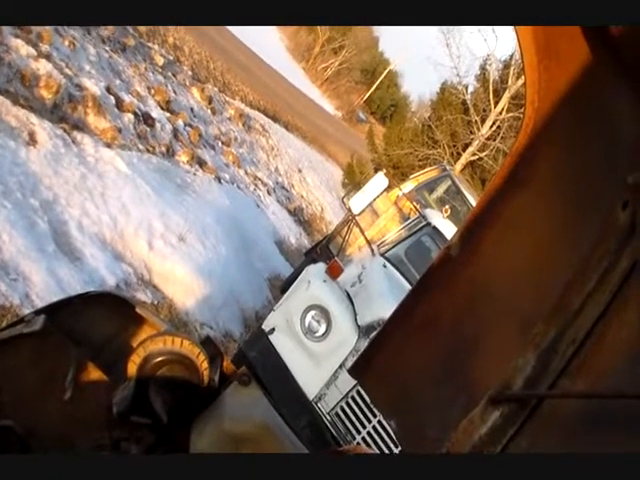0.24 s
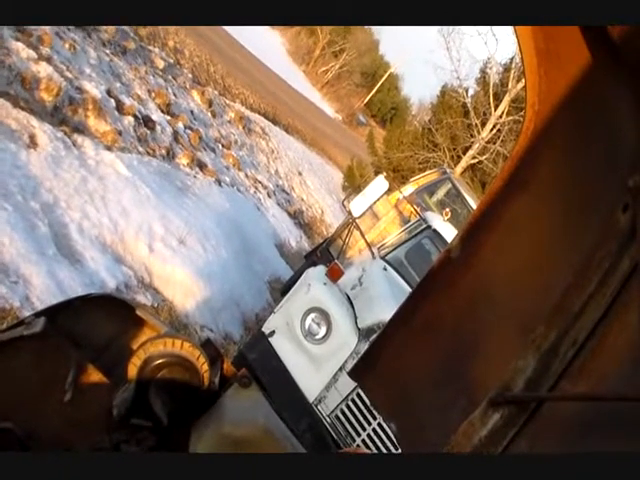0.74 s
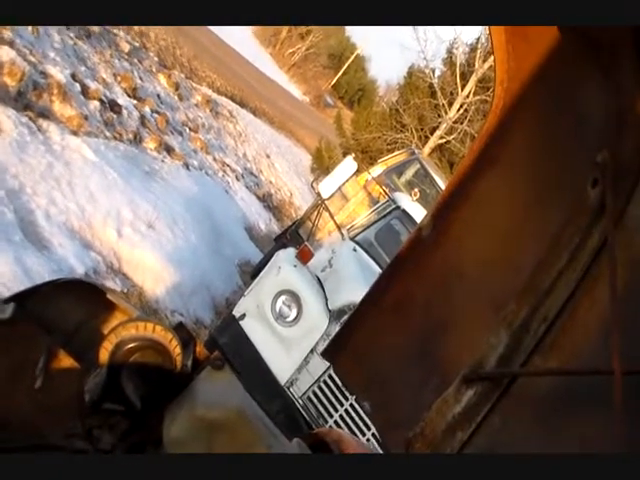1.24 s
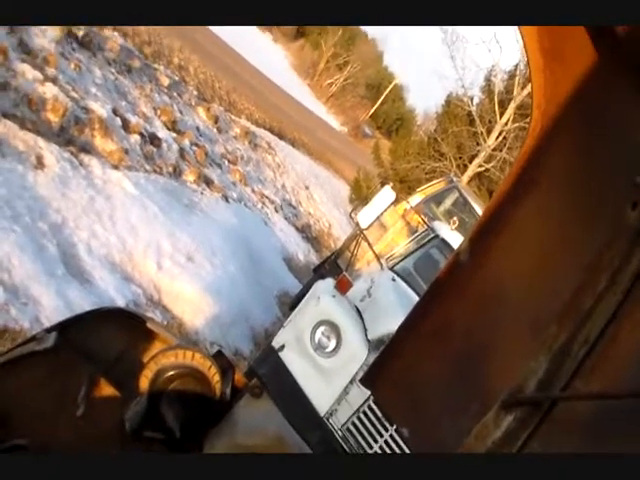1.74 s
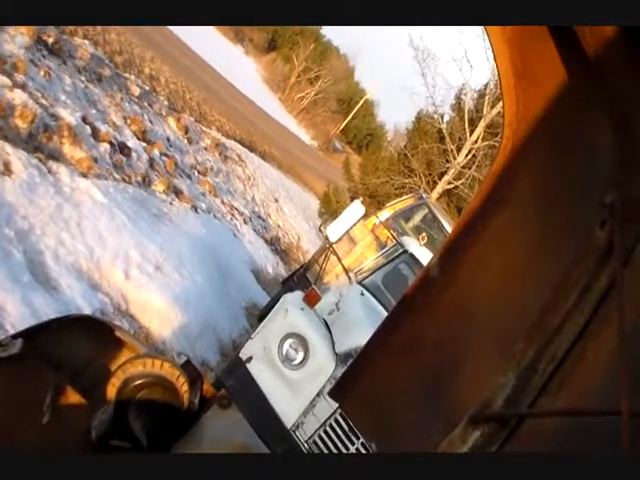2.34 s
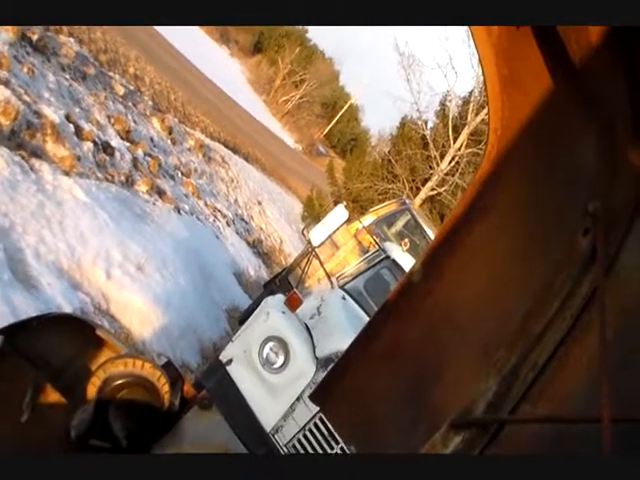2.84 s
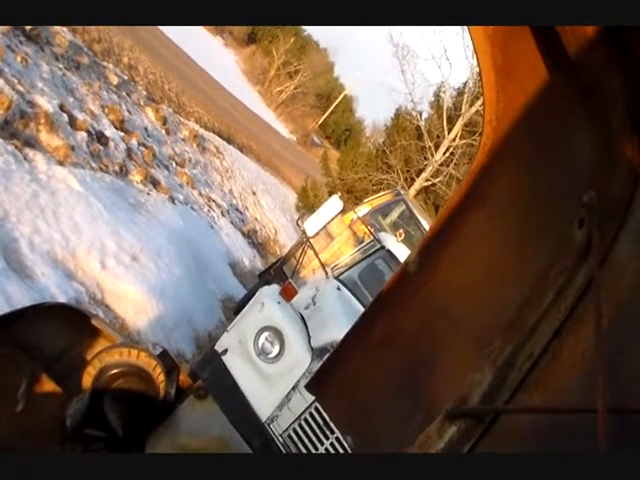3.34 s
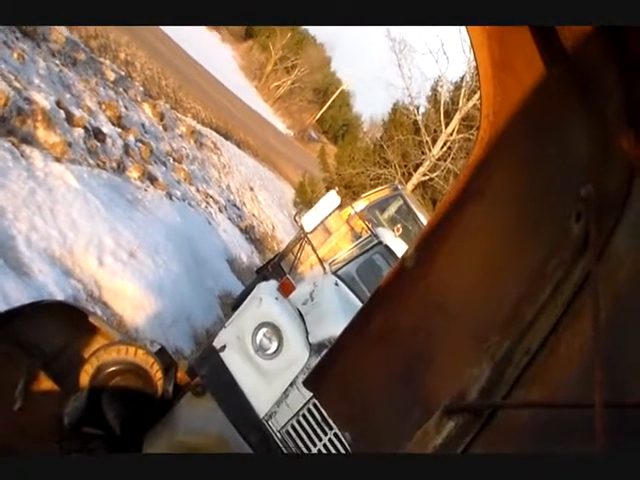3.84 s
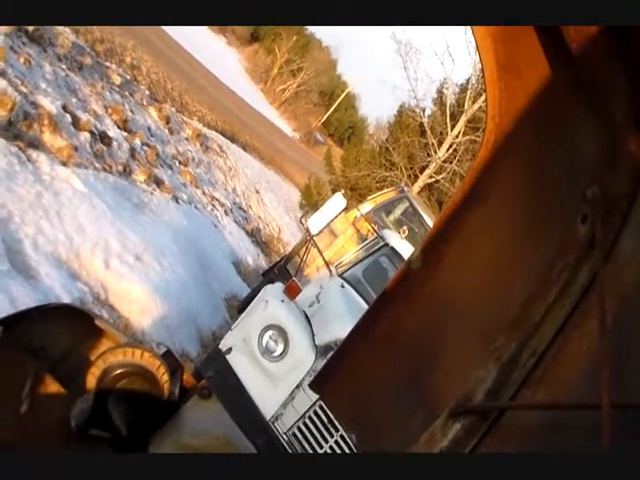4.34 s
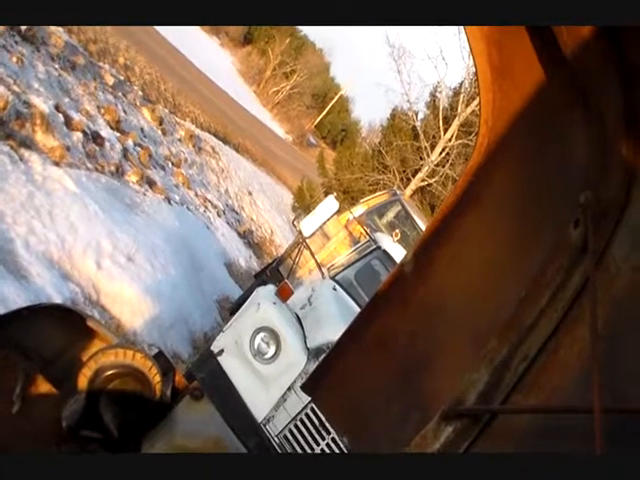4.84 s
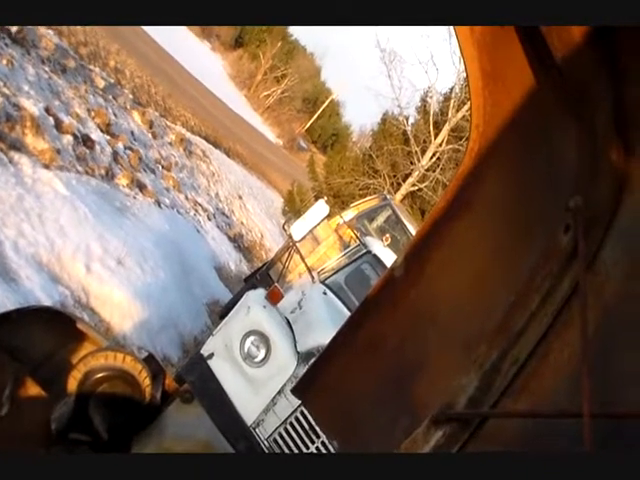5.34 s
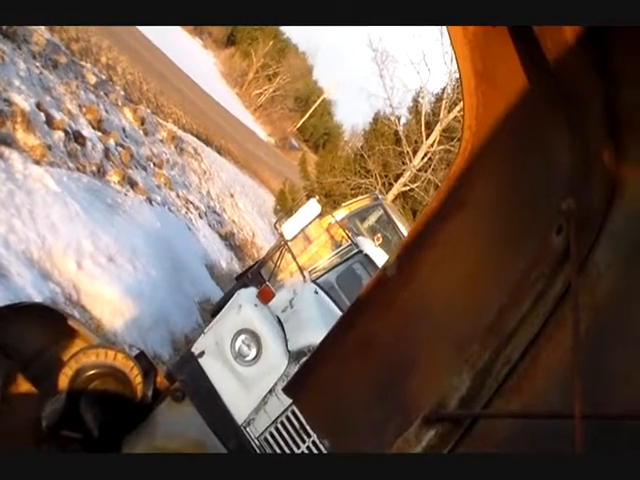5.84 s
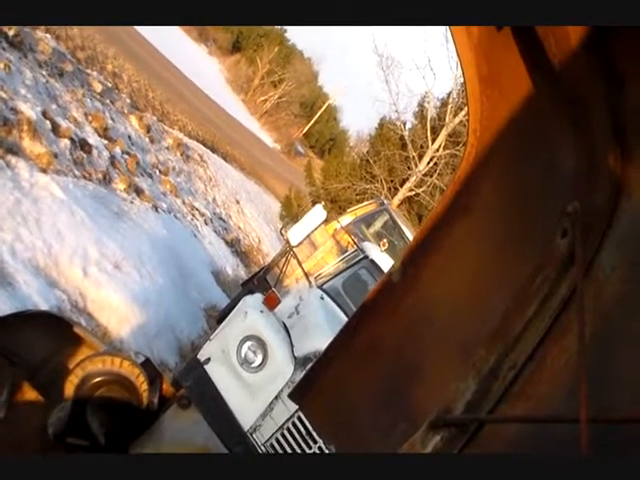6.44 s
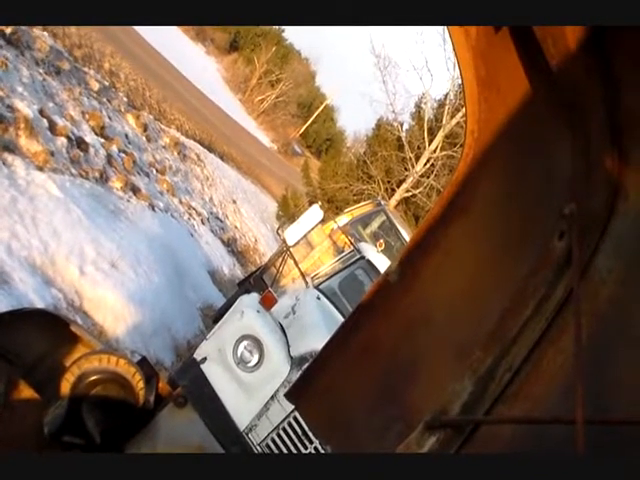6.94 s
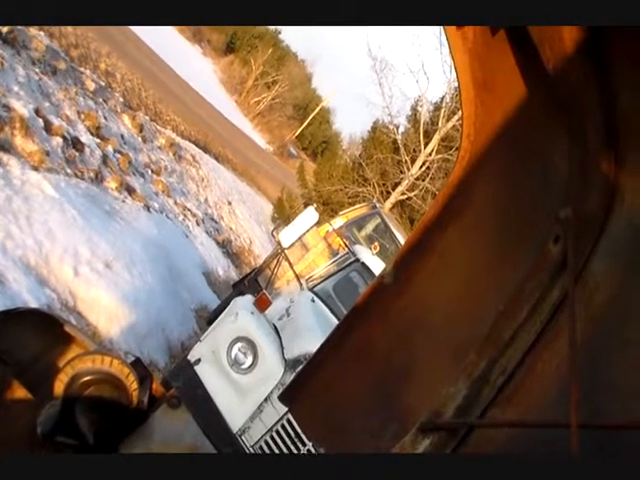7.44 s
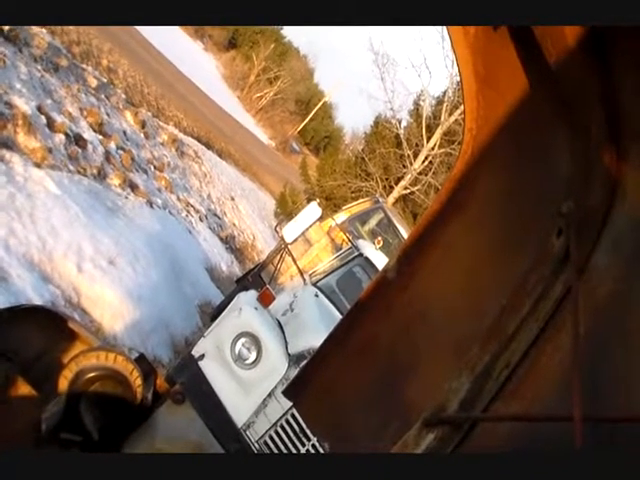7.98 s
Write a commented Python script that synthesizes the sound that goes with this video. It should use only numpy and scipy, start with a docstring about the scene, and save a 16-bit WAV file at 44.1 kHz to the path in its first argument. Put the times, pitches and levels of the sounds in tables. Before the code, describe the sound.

Four starter attempts on a cold engine, separated by pauses of about a second or less. Each opens with a faint metallic slide and a cluster of hard clacks, then a rising whir with scraping teeth that sags into labored, rumbling cranking. The first is loudest and roughest. Low wind gusts and pointed thumps hit the close stereo microphone over faint hiss; nothing catches.

```python
"""A starter motor cranks a cold truck engine four times; it never catches. Coloured noise carries the scrape,
rasp, whir and rumble, and sines at orders of the shaft speed sing as it spins up and sags under compression.
Chatter filtered by the castings gives the clatter of the pinion into the ring gear; sines near the pipe modes
give the exhaust booms. Gusts of low noise and pointed buffets thump two microphone ports over a faint hiss."""
import sys
import numpy as np
from scipy import signal
from scipy.fft import rfft, irfft, next_fast_len
from scipy.io import wavfile
from scipy.ndimage import uniform_filter1d

SR = 44100
rng = np.random.default_rng(int(sys.argv[2]) if len(sys.argv) > 2 else 0)


def generate_wav(sig):
    """Save sig (samples, or channels by samples) to the path in sys.argv[1] as 16-bit PCM at SR."""
    pcm = np.round(np.clip(np.atleast_2d(sig).T, -1, 1) * 32767).astype(np.int16)
    wavfile.write(sys.argv[1], SR, pcm)


N = 362061
TIME = np.arange(N) / SR

# Levels are relative: filters and layer gains follow. Spectra are scaled to unit energy.
# Metal blows as the pinion engages and lets go:
# [t/s, level/dB, treble level re blow/dB, t60/s, mode f/Hz, mode level re blow/dB]
BLOWS = [(0.397, -12, -12.5, 0.17, 1490, -28), (0.421, -9, -27, 0.21, 1417, -8),
         (0.446, -17.5, -4, 0.089, 867, 9), (0.82, -19.5, -14, 0.59, 793, -10.5),
         (1.769, -38, -14, 0.2, 990, -16), (2.965, -11, -13.5, 0.17, 649, -8),
         (2.989, -11, -31, 0.14, 1388, 2), (3.019, -19.5, -30, 0.17, 984, -0.5),
         (3.329, -28.5, -2.5, 0.091, 743, 4), (3.374, -27, -33, 0.14, 1384, -4),
         (4.412, -45, 8, 0.08, 780, -6), (5.354, -10, -14.5, 0.15, 650, -8),
         (5.373, -10, -28, 0.24, 1382, -12), (5.402, -6, -18, 0.071, 1034, -0.6),
         (5.744, -20, -14, 0.096, 870, -5), (5.783, -29, -29, 0.13, 1370, -1),
         (6.889, -29, 2.5, 0.043, 1270, 6), (2.07, -42, -18, 0.22, 985, -12),
         (6.982, -31.5, -29, 0.1, 747, -11), (7.566, -11, -13.5, 0.14, 676, -11),
         (7.588, -3.5, -31, 0.11, 1425, -5.5), (7.614, -2.5, -15, 0.069, 675, -8),
         (7.623, -20.5, -46, 0.15, 957, 5.5)]
# The pinion slides out before each engagement: [t/s, level/dB]
SLIDES = [(.309, -54.5), (.359, -48.5), (2.925, -45.5), (5.302, -45.5), (7.517, -41.5)]
# Common to all slides: [treble level re blow/dB, t60/s, mode f/Hz, mode level re blow/dB]
SLIDE_SOUND = (0.5, 0.48, 1409.5, -2)
# Starting attempts: [spin-up start t/s, load onset t/s, hardest cranking t/s, stop t/s, shudder level/dB,
# spin level/dB, cranking level/dB, singing level/dB, passing PASSING_TURNS t/s, sag onset t/s]
TRIES = [(.46, 0.831, 1.065, 2.052, -35, -26.5, -34, -32, 0.57, 0.91),
         (3.04, 3.374, 3.82, 4.477, -49, -37, -38, -38.5, 3.11, 3.31),
         (5.43, 5.794, 6.164, 6.92, -51, -35, -37, -41, 5.49, 5.8),
         (7.64, 8.231, 8.1, 9.3, -37, -35.5, -50, -54, 7.755, 8.5)]
# The spin-up grinds suddenly harder: [start t/s, end t/s, start lift/dB, end lift/dB]
SURGES = [(0.677, 0.852, 7, 0.83), (8.118, 8.3, 8.5, 17)]
# Three groups of sung shaft orders, rows of each: [multiple of the shaft speed, level/dB]
SHAFT_ORDERS = [
    [(2, 0.5), (6, -5), (6.6, -4.5), (8, -5.5)],
    [(3, -0.3), (5, -5.5)],
    [(41, -5.5), (42, -7), (49, -12)],
]
# Held notes of the exhaust pipe: [start t/s, end t/s, f/Hz, start level/dB, end level/dB]
BOOMS = [(0.74, 0.954, 84, -29.5, -25), (.97, 1.074, 168, -39, -32), (0.976, 1.096, 240, -40, -33),
         (1.07, 1.227, 511, -35, -36), (5.904, 6.286, 251.4, -42.5, -37), (7.21, 7.345, 245, -57, -59),
         (3.31, 3.454, 84, -45, -44), (5.697, 5.938, 84, -39, -41.5), (5.873, 7.62, 168, -47, -49.5),
         (7.95, 8.302, 84, -50, -30), (8.078, 8.3, 168, -50, -43)]
# Pipe resonances in the rumble: [multiple of PIPE_HZ, width/Hz, lift/dB]
PIPE_RESONANCES = [(3, 6.5, 8.5), (4, 7, 6), (6.1, 6.1, 11), (7.9, 25, 9.5)]
# Resonances of the starter and block castings: [f/Hz, width/Hz, lift/dB]
CASTING = [(660, 50, 4), (829, 60, 5), (980, 35, 6), (1400, 45, 6), (1600, 70, 3), (1885, 50, 5),
           (2230, 90, 5), (2620, 50, 4), (2810, 50, 4), (3290, 60, 4), (4090, 70, 6), (4270, 45, 3),
           (4880, 65, 4), (5230, 55, 3), (5510, 60, 5), (5690, 50, 4), (6100, 50, 3), (6740, 60, 5),
           (6970, 60, 5), (7530, 60, 4)]

# Spectra of the blows, body and treble: [f/Hz, level/dB]
CLACK = [(88, -42), (150, -17), (466, -9.5), (710, -6.5), (1140, -8.5), (1370, -7.5), (1630, -9),
         (3500, -33.5), (4550, -46.5), (7700, -120)]
SIZZLE = [(1470, -40.5), (2500, -3), (2710, -6), (3070, -10), (5400, -10.5), (8320, -21), (10400, -16.5),
          (14400, -26.5)]
# Spectra of the scraping teeth, their rasp in the spin-up, the brushes and the block: [f/Hz, level/dB]
GRIND = [(290, -38.5), (500, 2), (552, -7.5), (828, -5.5), (942, -3), (1580, -3.5), (1950, -6),
         (3100, -8.5), (4030, -11.5), (6820, -120)]
STRAIN = [(240, -32), (400, -7.5), (840, -4), (1310, -3), (1500, -6), (2000, -2), (2900, -5.5),
          (3500, -10.5), (5500, -15), (9100, -37), (15400, -120)]
WHIR = [(1710, -24.5), (2900, -20), (3120, -18), (3980, -0.5), (5560, 1.5), (6150, -4), (6800, -2.5),
        (8260, -9.5), (11500, -10), (14400, -18)]
RUMBLE = [(24, -19), (40, -2), (75, -2), (130, -8.5), (246, -5), (459, -7.5), (506, -6.5), (550, -14.5),
          (1100, -24), (1430, -29), (2420, -120)]
# Spectra of the wind at a port and of the microphone hiss: [f/Hz, level/dB]
GUST = [(7.1, -48), (12, -3), (69, 3.5), (86, 1.5), (108, -0.5), (213, -10.5), (367, -20.5), (665, -36.5),
        (700, -42.5), (910, -60), (1540, -120)]
HISS = [(350, -41), (600, 2.5), (1520, -1), (1740, -3), (2010, -2), (4970, -5.5), (12500, -7),
        (14400, -7.5)]

# Wind strength at the two ports: [t/s, left level/dB, right level/dB]
WIND = [(0, -30, -22.5), (.45, -34.5, -31.5), (.62, -27.5, -34), (1.05, -41.5, -32), (1.502, -26, -33),
        (1.9, -28, -33.5), (2.5, -31.5, -32), (2.9, -35.5, -35), (3.05, -48, -51), (3.449, -56, -44),
        (3.95, -30.5, -39), (4.45, -31.5, -30.5), (4.851, -36.5, -42), (5.33, -39, -34.5), (5.5, -58, -51),
        (5.8, -47, -55), (6.3, -34, -34.5), (7.1, -37.5, -37), (7.5, -43.5, -43), (7.8, -48, -50),
        (8.21, -68, -54)]
# Single buffets of wind: [t/s, left level/dB, right level/dB, f/Hz]
BUFFETS = [(.1, -26, -22, 98), (.183, -40, -31, 132), (0.294, -16.5, -56, 175), (1.931, -16, -50, 180),
           (2.109, -18.5, -31, 127.3), (2.161, -20.5, -50, 93.4), (2.255, -16.5, -37, 127),
           (2.374, -16, -47, 127), (2.409, -19, -41, 127), (2.52, -17, -44, 105), (2.542, -18, -40, 186),
           (2.671, -18.5, -31, 107), (2.703, -15.5, -43, 195), (2.723, -22.5, -40, 166),
           (2.812, -31, -50, 90), (4.688, -39, -39, 68), (5.107, -50, -32.5, 64.6), (6.749, -25, -31, 74)]
# Likeness of the ports, as correlation: [f/Hz, correlation]
SAME = [(100, 0.98), (1000, .99), (2900, 0.93), (4500, 0.84), (6400, 0.37), (9000, 0.11), (14000, -0.43)]
# Balance of the ports: [f/Hz, left minus right level/dB]
TILT = [(60, -4.5), (180, -1), (530, 0.0), (1580, -0.5), (4700, -2.5), (14000, 0)]

# How each layer answers the phases of a try: [shudder level/dB, spin level/dB, share of a surge,
# cranking level/dB, drop at load onset re hardest/dB, drop at stop re hardest/dB, final fade/(dB/s)]
GRIND_RULE = (2, -10.5, 0.5, 0.3, 13.5, 13, 88)
STRAIN_RULE = (-40, -0.76, 1.05, -30, 13, 13, 110)
WHIR_RULE = (-34, -7.5, 0.69, -0.2, 14, 19, 198)
RUMBLE_RULE = (5, -8.5, 0.84, 4.5, 13.5, 25, 58)
PIPE_RULE = (-40, -39, 1, -4, 6.5, 14, 96)
# One row for each group of orders, same columns, cranking counted from the singing level
SONG_RULES = [(-30, -10, 1, -3, 11, 190, 100), (-24, -12, 0.65, -2, 21, 34, 100),
              (-40, -18, .3, -5.5, 6.8, 88, 100)]

PIPE_HZ = 84.0  # lowest pipe mode
RISE_S = 0.0083  # half the rise time of a blow
PASSING_TURNS, FREE_TURNS, SAG_TURNS = 100, 147, 58  # turns per second
SPIN_S, SAG_S = .22, .55  # time constants of the run-up and the sag
WOBBLE, LOADED_WOBBLE = .01, .01  # rms share of the speed: always, and added while it falls
SHUDDER_DB_PER_S, LOAD_DB_PER_S = 234, 364  # die-away of the shudder, cut of the spin by the load
SPIN_DB_PER_S, SONG_DB_PER_S = 34, 23  # climb in the spin-up: noise layers, singing
HISS_DB, EDGE_HZ = -60, 14350  # relative hiss level, upper band limit


def gain_of(db):
    """Decibel law: a level difference as an amplitude ratio."""
    return 10 ** (np.asarray(db) / 20)


def evened(x):
    """Normalization to a root mean square of 1."""
    return x / np.sqrt(np.mean(x ** 2) + 1e-20)


def read(points, hz):
    """Interpolation of a spectrum along a logarithmic frequency axis."""
    f, value = np.transpose(points)
    return np.interp(np.log(hz + 1), np.log(f + 1), value)


def colour(x, spectrum, modes=()):
    """Minimum-phase filtering: a causal response of unit energy, with resonant lifts on a spectrum."""
    hz = abs(np.fft.fftfreq(16384, 1 / SR))
    db = read(spectrum, hz)
    for f, width, lift in modes:
        db = db + lift / (1 + (2 * (hz - f) / width) ** 2)
    log_gain = np.log(gain_of(np.maximum(db, -100)))
    # the Hilbert transform of the log gain supplies the phase
    taps = np.fft.ifft(np.exp(np.conj(signal.hilbert(log_gain)))).real[:8192]
    taps = taps / np.linalg.norm(taps)
    return signal.oaconvolve(x, taps.reshape((1,) * (x.ndim - 1) + (-1,)), axes=-1)[..., :N]


def lumps(rate_hz, depth_db, channels=1):
    """Random amplitude modulation: low-passed noise read as decibels, a gain of rms 1."""
    slow = signal.lfilter(*signal.butter(2, rate_hz, fs=SR), rng.standard_normal((channels, N)))
    return evened(gain_of(depth_db * evened(slow)))


def patchy(x, depth_db):
    """Wandering resonance: narrow, lingering streaks rise and sink, as loose parts take turns to hum."""
    z = signal.stft(x, nperseg=1024)[2]
    streaks = uniform_filter1d(rng.standard_normal(z.shape[1:]), size=12, axis=1)
    gain = gain_of(depth_db * evened(streaks))
    return evened(signal.istft(z * gain, nperseg=1024)[1][:, :N])


def window(start, end, fade_s=0.036):
    """Gating: a gain of 1 between two moments, with a squared fade outside."""
    return np.clip(np.minimum(TIME - start, end - TIME) / fade_s + 1, 0, 1) ** 2


def add(mix, at, sound):
    """Superposition of a sound on the mix from a sample index."""
    mix[:, at:at + sound.shape[1]] += sound


def ports(x):
    """Coherence of close ports: the first row of x is shared, the second opposed, more so in the treble."""
    size = next_fast_len(N)
    hz = np.fft.rfftfreq(size, 1 / SR)
    half_angle = np.arccos(np.clip(read(SAME, hz), -1, 1)) / 2
    mid, side = rfft(x, size) * [np.cos(half_angle), np.sin(half_angle)]
    tilt = gain_of(read(TILT, hz) / 2)
    return irfft(np.array([(mid + side) * tilt, (mid - side) / tilt]), size)[:, :N]


def speed():
    """Exponential approach: turns per second run up towards the free speed, then sag under load."""
    out = np.full(N, float(SAG_TURNS))
    for start, load, *_, passing, sags in TRIES:
        run_s = np.clip(TIME, start, min(load, sags)) - passing
        rise = FREE_TURNS - (FREE_TURNS - PASSING_TURNS) * np.exp(-run_s / SPIN_S)
        sag = np.exp(-np.maximum(TIME - sags, 0) / SAG_S)
        out = np.where(TIME < start, out, SAG_TURNS + (rise - SAG_TURNS) * sag)
    return uniform_filter1d(out, size=2000)


def effort(rule, sings=False):
    """Power sum of three phases: a dying shudder, a climbing spin cut by the load, the arch of cranking."""
    shudder_db, spin_db, share, crank_db, climb_db, sag_db, stop_db_per_s = rule
    surge_db = share * sum(np.interp(TIME, [a, b], db) * window(a, b) for a, b, *db in SURGES)
    climb_db_per_s = SONG_DB_PER_S if sings else SPIN_DB_PER_S
    power = np.zeros(N)
    for start, load, hardest, stop, shudder, spin, crank, song, *_ in TRIES:
        before, after = np.maximum(load - TIME, 0), np.maximum(TIME - load, 0)
        climb = climb_db * ((hardest - TIME) / (hardest - load)) ** 2
        sag = sag_db * ((TIME - hardest) / (stop - hardest)) ** 2
        arch = np.where(TIME < hardest, climb, sag) + stop_db_per_s * np.maximum(TIME - stop, 0)
        phases = [shudder + shudder_db - SHUDDER_DB_PER_S * abs(TIME - start),
                  spin + spin_db + surge_db - climb_db_per_s * before - LOAD_DB_PER_S * after,
                  (song if sings else crank) + crank_db - arch]
        power += (gain_of(phases) ** 2).sum(0) * window(start, stop + 1) ** 2
    return np.sqrt(power)


def microphone_hiss(dry):
    """Gain reduction: sound above the wind's range pulls the hiss down, and it creeps back."""
    heard = signal.lfilter(*signal.butter(2, 400, "high", fs=SR), dry)
    power_db = 10 * np.log10(abs(uniform_filter1d((heard ** 2).mean(0), 900)) + 1e-12)
    recovery = TIME * 10.0  # the held peak falls 10 dB per second
    held_db = np.maximum.accumulate(power_db + recovery) - recovery
    over_db = np.maximum(held_db + 34.5, 0)
    hiss = np.sqrt(2) * gain_of(HISS_DB) * colour(rng.standard_normal((2, N)), HISS)
    return hiss / gain_of(0.42 * uniform_filter1d(over_db, 400))


def wind():
    """Turbulent pressure: lumpy low noise, unrelated between ports, and buffets with pointed crests."""
    s, left_db, right_db = np.transpose(WIND)
    level = gain_of([np.interp(TIME, s, left_db), np.interp(TIME, s, right_db)])
    gusts = colour(rng.standard_normal((2, N)) * lumps(7.6, 4.4, channels=2), GUST)
    out = gusts * level * lumps(2.23, 0.74, channels=2)
    t = np.arange(-1000, 1000) / SR
    for s, left_db, right_db, hz in BUFFETS:
        u = np.pi * hz * t
        pulse = (1 - 2 * u ** 2) * np.exp(-u ** 2)
        crest = .4 * np.exp(-(u / .28) ** 2)
        add(out, round(s * SR) - 1000, np.outer(-gain_of([left_db, right_db]), pulse + crest))
    return out


def exhaust():
    """Pipe resonance: air pumped by the pistons puffs two low modes and at times holds a drifting note."""
    drift = 1 + 0.015 * evened(uniform_filter1d(rng.standard_normal(N), 2500))
    cycle = 2 * np.pi * np.cumsum(drift) / SR  # phase of a 1 Hz tone
    puffs = sum(np.sin(k * PIPE_HZ * cycle) * lumps(7.2, 6.0)[0] for k in (1, 2))
    out = puffs * effort(PIPE_RULE)
    for start, end, hz, from_db, to_db in BOOMS:
        level = gain_of(np.interp(TIME, [start, end], [from_db, to_db]))
        out += np.sin(hz * cycle) * level * window(start, end, fade_s=0.035)
    return np.sqrt(2) * out


def blows():
    """Impact excitation: a dying shower of chatter drives the castings; where it lands favours one mode."""
    body, treble, ring = np.zeros((3, N + SR))
    t = np.arange(SR // 2) / SR
    for s, db, treble_db, t60, hz, ring_db in BLOWS + [row + SLIDE_SOUND for row in SLIDES]:
        rise = np.minimum(t / (2 * RISE_S), 1) ** 2
        shape = gain_of(db - 60 * t / max(t60, .01)) * rise
        at = round((s - RISE_S) * SR)  # the given moment falls midway through the rise
        body[at:][:len(t)] += shape
        treble[at:][:len(t)] += shape * gain_of(treble_db)
        waver_hz = 60.0 * evened(uniform_filter1d(rng.standard_normal(len(t)), 150))
        phase = 2 * np.pi * np.cumsum(hz + waver_hz) / SR
        ring[at:][:len(t)] += shape * gain_of(ring_db) * np.sin(phase)
    chatter = rng.standard_normal((2, N)) * lumps(120, 2.5)
    clack = 0.42 * colour(chatter * body[:N], CLACK, CASTING)
    sizzle = 1.6 * colour(chatter * treble[:N], SIZZLE, CASTING)
    return clack + sizzle + ring[:N]


def starter():
    """Rotating machinery: teeth scrape and knock, brushes whir, the block rumbles, the armature sings orders."""
    turn_rate = speed()
    slowed = np.gradient(turn_rate) < 0
    unsteadiness = evened(uniform_filter1d(rng.standard_normal(N), 1500))
    turns = np.cumsum(turn_rate * (1 + (WOBBLE + LOADED_WOBBLE * slowed) * unsteadiness)) / SR
    teeth = lumps(430, 0.29) * lumps(19, 0.92)
    knock = .35 * evened(np.diff(np.floor(turns), prepend=0))  # one a turn
    scrape = (rng.standard_normal((2, N)) + knock) * teeth
    grind = patchy(colour(scrape, GRIND, CASTING), depth_db=3.1)
    whir = patchy(colour(rng.standard_normal((2, N)) * lumps(45, 0.58), WHIR, CASTING), depth_db=3.5)
    rasp = (rng.standard_normal((2, N)) + knock) * teeth * lumps(60, 0.53)
    strain = colour(rasp, STRAIN, CASTING)
    pipe = [(k * PIPE_HZ, width, lift) for k, width, lift in PIPE_RESONANCES]
    rumble = colour(rng.standard_normal((2, N)) * lumps(31, 1.0), RUMBLE, pipe)
    out = grind * effort(GRIND_RULE) + whir * effort(WHIR_RULE)
    out += rumble * effort(RUMBLE_RULE) + strain * effort(STRAIN_RULE)
    for rule, orders in zip(SONG_RULES, SHAFT_ORDERS):
        level = effort(rule, sings=True)
        for k, db in orders:
            tone = np.sqrt(2) * gain_of(db) * np.sin(2 * np.pi * k * turns)
            out += tone * lumps(14, 4.2) * level
    return out


def scene():
    """Superposition: the truck reaches both ports, and the wind acts on them directly."""
    return ports(blows() + starter() + exhaust()) + wind()


def record(dry):
    """Saturation and band limiting: hiss joins the sound, peaks are rounded, the top is cut."""
    wet = dry + microphone_hiss(dry)
    ceiling = .34
    edge = signal.firwin(2047, EDGE_HZ, window=("kaiser", 10), fs=SR)
    return signal.oaconvolve(ceiling * np.tanh(wet / ceiling), edge[None], "same")


dry = scene()
out = record(dry)
generate_wav(out)
```